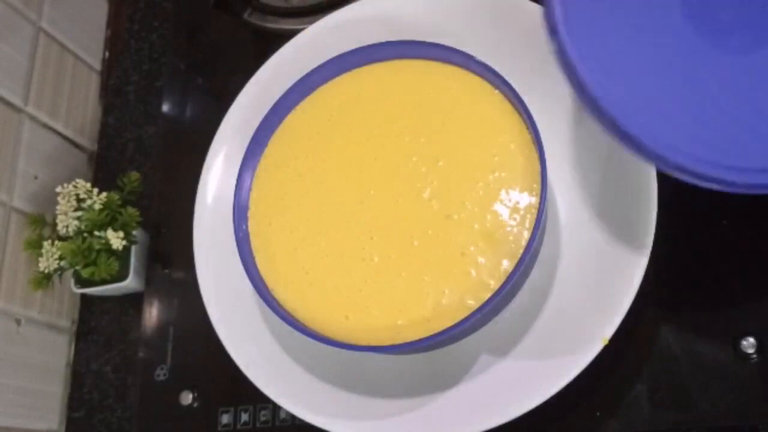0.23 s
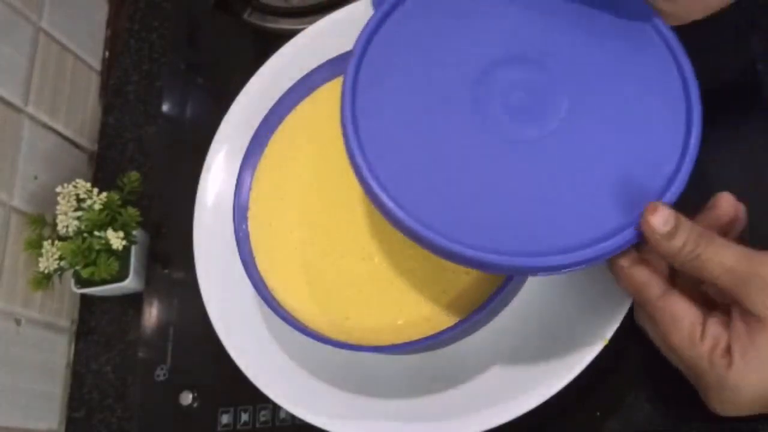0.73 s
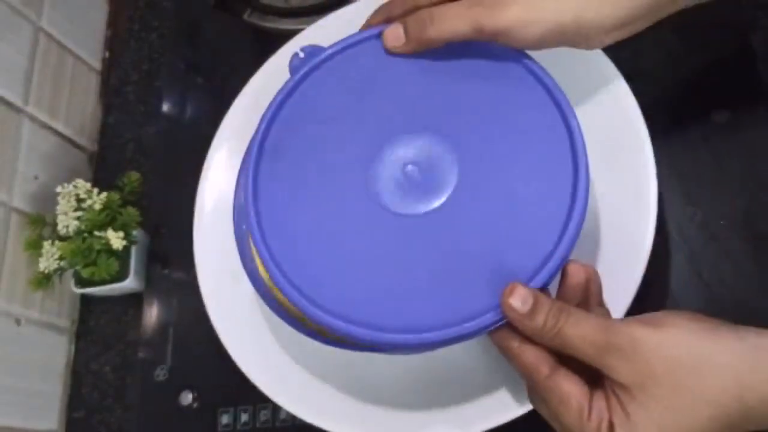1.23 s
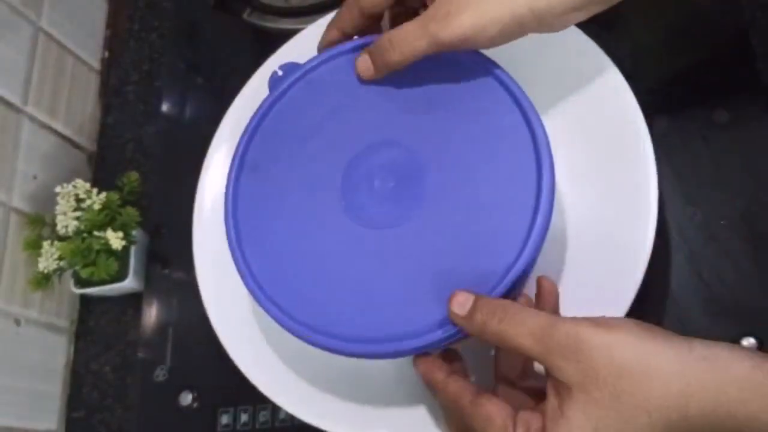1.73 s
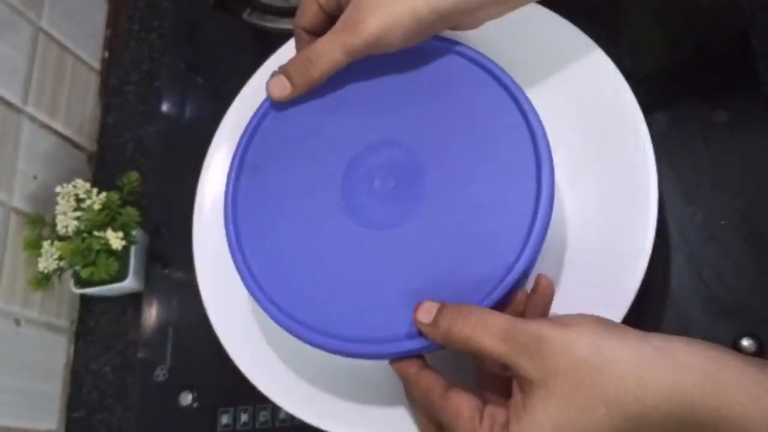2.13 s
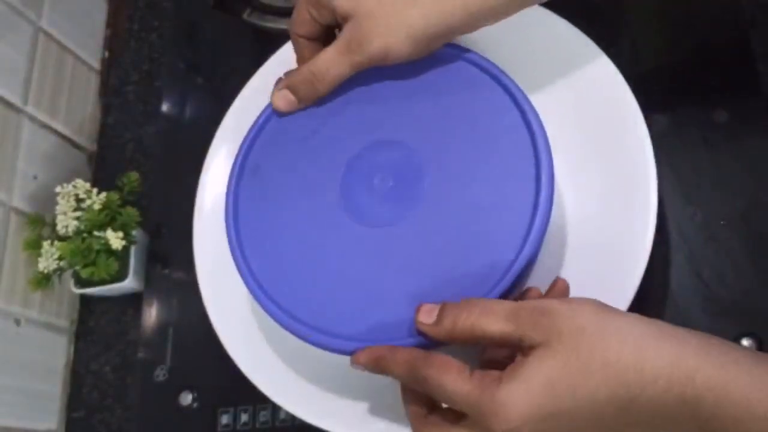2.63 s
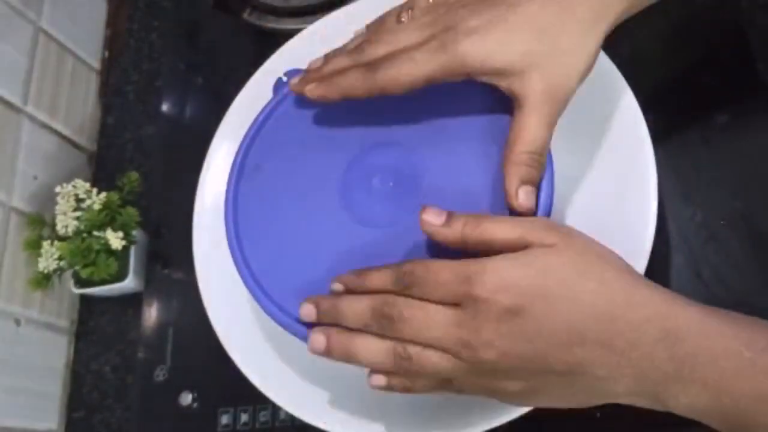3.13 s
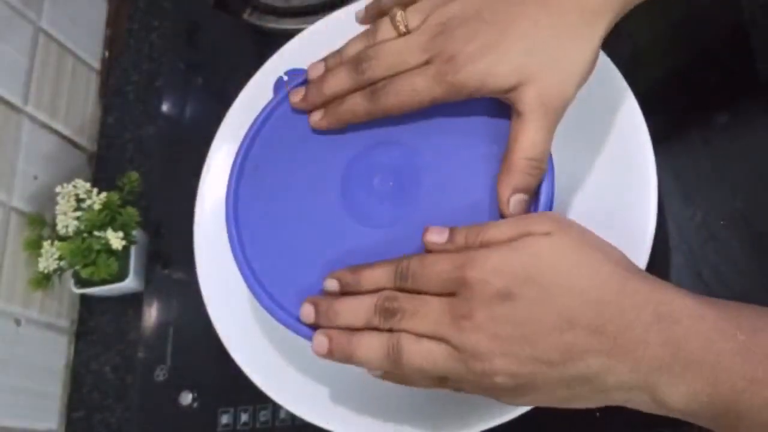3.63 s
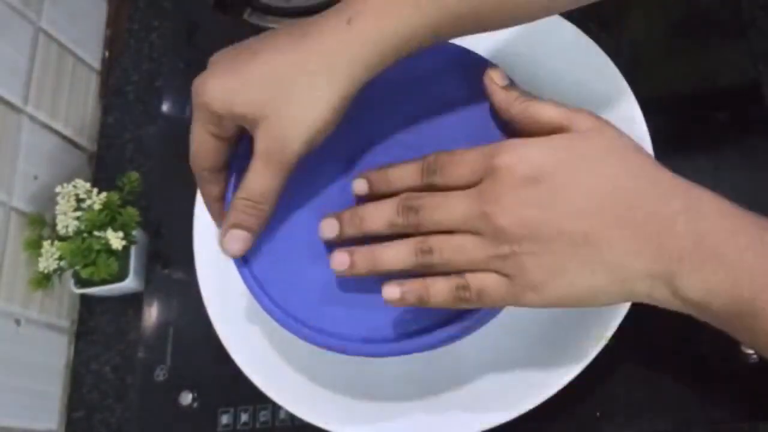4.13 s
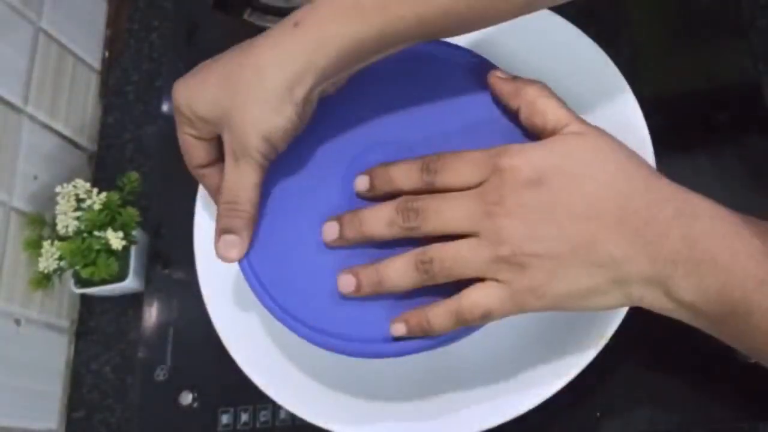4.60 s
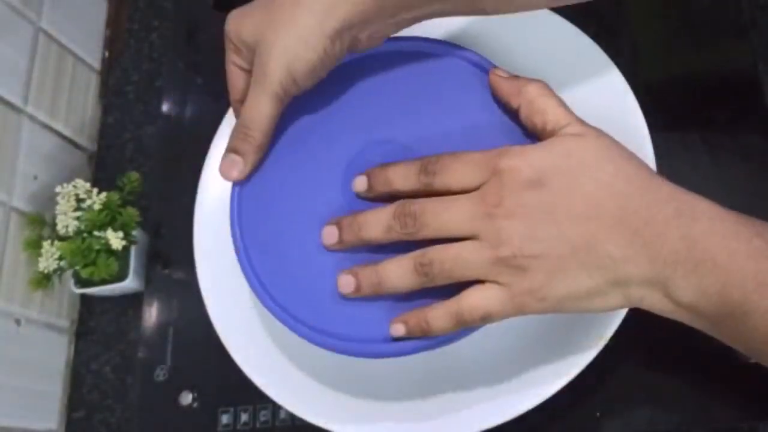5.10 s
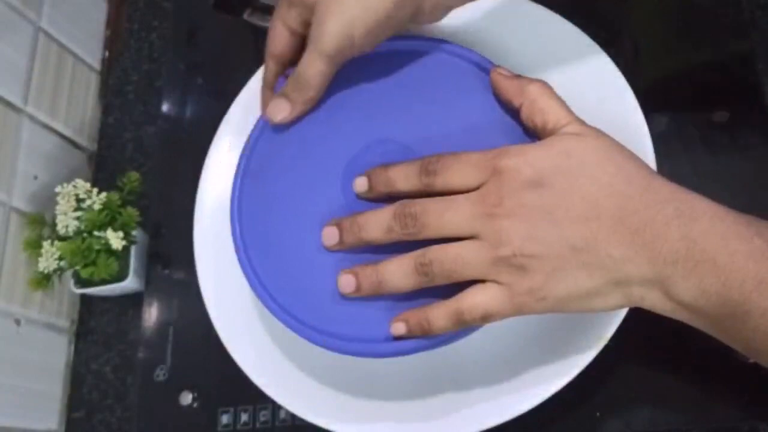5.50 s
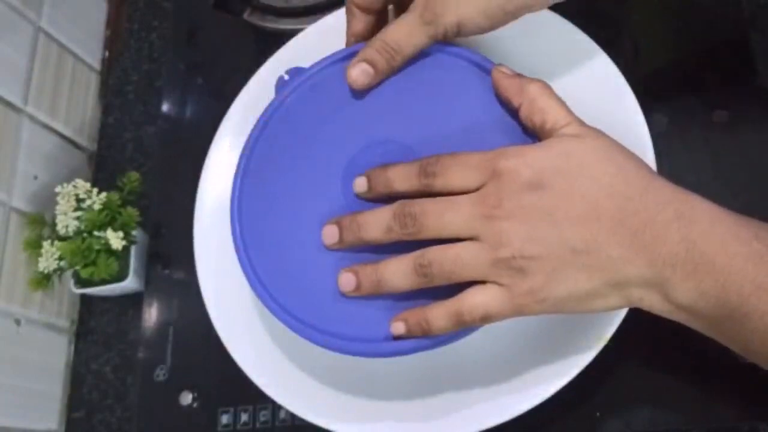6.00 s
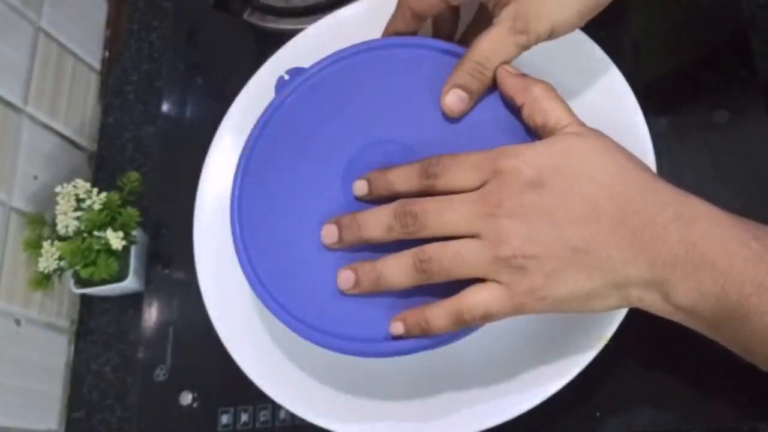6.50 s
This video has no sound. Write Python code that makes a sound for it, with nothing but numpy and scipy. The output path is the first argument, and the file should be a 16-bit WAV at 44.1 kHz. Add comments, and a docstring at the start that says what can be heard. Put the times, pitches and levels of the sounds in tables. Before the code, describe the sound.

In a hard-walled kitchen, a plastic lid is set on a round tub standing on a plate and pressed shut. Light clicks come first, then a quick cluster of louder snaps, a pause, and one strong hollow knock. More separate clicks follow, with faint rubs of fingers on plastic. The sounds are close, with a short echo, over low room noise and a faint motor hum.

```python
"""In a hard-walled kitchen, a plastic lid is set on a round tub standing on a plate and pressed home.
The rim snaps in bit by bit: each snap is an impulsive crackle that excites the modes of lid, tub and plate.
Between snaps, fingers slide on the lid with a frictional hiss. The walls reverberate,
over steady room noise and the wavering hum of an appliance motor."""
import sys
import numpy as np
from scipy import signal
from scipy.fft import rfft, irfft, next_fast_len
from scipy.io import wavfile
from scipy.ndimage import uniform_filter1d

SR = 44100
rng = np.random.default_rng(int(sys.argv[2]) if len(sys.argv) > 2 else 0)


def to_wav(s):
    """Save 16-bit WAV."""
    ch = np.atleast_2d(s).T  # columns
    pcm = np.round(np.clip(ch, -1, 1) * 32767)  # PCM
    wavfile.write(sys.argv[1], SR, pcm.astype(np.int16))


N = 297675

# Snaps of the rim: (time [s], strength [dB], weight: how far the tub moves [dB],
# brightness: how hard the edge slips [dB], rim pitch [Hz], its level [dB], second pitch [Hz],
# its level [dB], plate jolt [dB], crackle decay time [ms]); levels and jolt add to strength
RIM_SNAPS = [(1.2662, -50.5, -4, -46, 960, 9.5, 1920, -2, -14, 2.45),
             (1.481, -39, -7.5, -39, 985, 9.5, 1970, -6, -20, 2.3),
             (1.5506, -41.5, -21, -49, 896, 12, 1720, 9, -15, 2.3),
             (1.7378, -54, -1.5, -11, 700, 7, 2500, -6, -4, 2.74),
             (1.943, -35, -17, 0.5, 3770, 16, 1390, 10.5, -0.5, 2.84),
             (2.1658, -39.5, -13, -13.5, 1540, 11, 950, 4.5, -9, 5.36),
             (2.2298, -50, -25, -10, 1240, 15.5, 2000, 2, 5, 2),
             (2.319, -47.5, -9, -36, 1270, 18.5, 1650, 15.5, -17, 2.4),
             (2.5503, -35.5, -46, -7, 1270, 21.5, 1650, 14.5, 0.5, 3.7),
             (2.592, -38, 3, -26, 633, 18.5, 226, 17, 11, 7.4),
             (2.6075, -40.5, -11.5, 3.5, 790, 18, 1470, 8, -9, 9),
             (2.906, -27, -7, -12, 802, 13, 239, 10.5, -6, 4.64),
             (3.194, -37, -9.5, -9, 505, -3, 2100, 14.5, -16, 2.2),
             (3.233, -24, -14.5, -16, 827, 8, 2160, 8, -11.5, 3.33),
             (3.2545, -25, -8, -21, 850, 10, 251, 5, -15, 3.8),
             (3.277, -21.5, -15, -20.5, 785, 4.5, 920, -6, -27, 4),
             (3.7537, -53, -6.5, -16, 690, -13, 2500, -9, 0, 3.43),
             (3.8625, -51, -1.5, -6.5, 765, 0, 2500, -10, -8, 7),
             (4.0795, -57, -8, -3, 600, 6, 4500, 0, 3, 3),
             (4.262, -51, -3.5, -12, 1270, 6, 1060, 0, -15, 2.18),
             (4.7105, -15.5, -6.5, -4, 466, 6.5, 252, 9.5, -11, 2.75),
             (4.9823, -35, -7.5, -8, 846, 14, 405, 15.5, -11, 1.12),
             (5.241, -28, -8, -19, 755, 12, 2280, -10, -20, 2.95),
             (5.5209, -32, -7.5, -18, 853, 13, 366, 9, -19, 3.5),
             (5.8221, -22, -24.5, 3, 2020, 10, 5100, -5, 4, 5.7),
             (6.1532, -44.5, -10, -16, 1310, 14, 930, 7, 1, 3.7),
             (6.3192, -37.5, -23, -9, 1120, 12.5, 3900, 17, -1.5, 2.08),
             (6.3813, -52, -19, 5, 1070, 18.5, 2500, 5, -10, 2.4),
             (6.4534, -45.5, -22, -3, 1374, 9.5, 2960, 2, 1, 7),
             (6.7181, -53.5, 3.5, -39, 667, 18.5, 257, -10, -13, 4.6),
             (6.7267, -46, 0, -38, 614, 14, 255, -13, -14.5, 2.4)]
# Bands of a snap: (low edge [Hz], high edge [Hz], level over strength [dB], weight slope [dB/dB],
# brightness slope [dB/dB], stereo coherence [0-1], crackle share [0-1], room send [dB], left bias [dB])
SNAP_BANDS = [(66.5, 260, 10, 3.3, 0, 0.7, 0.06, -1.5, 3), (165, 474, 11, 1.05, 0, 0.89, 0.52, -1, -1),
              (444, 1770, 17, 0.68, 0.5, 0.85, 0.27, 1, -0.5),
              (1075, 2400, 15.5, 0.68, 0.12, 0.2, 0.55, -2, -1),
              (2250, 4680, 14, 0, 0.44, 0.1, 0.76, -5.5, -1.5), (5680, 10800, 16.5, 0, 1.48, 0, 1, -4, 2.5),
              (11000, 15500, 9, 0.6, 0.9, 0.4, 0.9, 0.5, -2)]
# Modes of lid and tub, and of the plate: (frequency [Hz], gain [dB], time to fall 60 dB [s])
TUB_MODES = [(161.5, -39, 0.084), (188.4, -35, 0.074), (274.3, -40, 0.07), (380, -46.5, 0.047),
             (435, -40, 0.048), (552, -36.5, 0.038), (624, -41, 0.087), (721, -43.5, 0.11),
             (796.2, -41, 0.12), (890, -49, 0.07), (971.5, -40, 0.078), (1083, -42, 0.091),
             (1330, -49, 0.065), (1690, -38.5, 0.02)]
PLATE_MODES = [(2027, -23.5, 0.071), (2736, -12, 0.035), (3220, -15.5, 0.042), (4006, -21, 0.087),
               (4456, -21, 0.049), (5800, -18, 0.015), (6503, -9, 0.056), (6570, -7, 0.047),
               (7280, -12.5, 0.041), (7560, -20, 0.034), (11900, -26, 0.02), (13000, -29, 0.017),
               (13900, -32, 0.02)]
# Finger strokes: (start [s], duration [s], hiss level [dB], low band over hiss [dB])
FINGER_STROKES = [(0.865, 0.068, -72, 8.5), (1.544, 0.33, -84.5, 12.5), (2.57, 0.052, -59.5, 4),
                  (3.223, 0.076, -72, 20), (3.815, 0.36, -74, 4.5), (4.962, 0.11, -57, -0.5),
                  (5.53, 0.23, -58, -1.5), (6.13, 0.24, -63, -1.5), (6.322, 0.21, -71, 5)]
# Decay of the kitchen: (frequency [Hz], reverberation time [s])
REVERB_TIMES = [(100, 0.31), (250, 0.69), (450, 0.63), (1000, 0.54), (3000, 0.53), (8000, 0.43),
                (14000, 0.34)]
# Left-right likeness of echoes and of room noise: (frequency [Hz], coherence [0-1])
ECHO_COHERENCE = [(60, 1), (300, 1), (700, 0.47), (1400, 0)]
NOISE_COHERENCE = [(60, 0.13), (300, 0.53), (700, 0.04), (1400, 0.15)]
# Room noise: (frequency [Hz], spectral density [dB per Hz])
NOISE_SPECTRUM = [(25, -110), (50, -103), (90, -89), (200, -93.5), (400, -93), (800, -101), (1400, -112),
                  (2500, -117), (4500, -115), (5300, -122), (6200, -115), (8000, -113), (15000, -113)]
# Resonances in the room noise: (centre [Hz], bandwidth [Hz], level [dB])
NOISE_RESONANCES = [(92.4, 16, -76), (316, 24, -75.5), (7404, 320, -78.5)]
# Extra treble loss of slides, echoes and room noise: (frequency [Hz], gain [dB])
SUSTAINED_RESPONSE = [(8500, 0.5), (8900, -18), (9900, -23.5), (11200, -34), (11600, 0.5), (15000, -1.5),
                      (15600, -4)]
# Overall treble colour, a peak near 7 kHz and then a deep gap at 9-11 kHz: (frequency [Hz], gain [dB])
TREBLE_COLOUR = [(4400, 7.5), (6000, 4), (7500, 7), (8400, 6.5), (8850, -8.5), (9800, -10), (11200, -30),
                 (11600, -4), (15000, 3), (15600, -24)]

RIM_Q, RIM_COHERENCE, RIM_CRACKLE_SHARE = 3.62, 0.94, 0.67
RELEASE_AT = 0.307  # moment of release, in crackle decay times
RADIATION_CUTOFF_HZ = 75  # the lid is too small to radiate below this
TUB_SPREAD, PLATE_SPREAD = 0.021, 0.0065  # relative shift of the modes as the grip moves
RIM_SEND_DB, TUB_SEND_DB, PLATE_SEND_DB, SLIDE_SEND_DB = -6, -5.5, -5, -1  # into the room
RIGHT_DELAY_S = 0.0001  # the lid lies nearer the left microphone
SLIDE_RISE_SHARE, SLIDE_TOP_DB = 0.18, 5.5
MOTOR_HZ, FUNDAMENTAL_DB, OCTAVE_DB = 143.8, -67, -71.5
LOWPASS_HZ = 16300


def snaps():
    """Impulsive excitation: the slipping rim drives lid, tub and plate. Returns direct sound and send."""
    (times, strength_db, weight_db, bright_db,
     rim_hz, rim_db, second_hz, second_db, jolt_db, decay_ms) = np.transpose(RIM_SNAPS)
    t = np.arange(2048) / SR
    decay_s = decay_ms[:, None] / 1000
    age = t / decay_s
    envelope = np.exp(-age) * (1 - np.exp(-2 * age))
    noises = np.moveaxis(rng.standard_normal((len(times), 2, len(t))), 1, 0) * envelope
    release = np.maximum(1 - np.abs(t - RELEASE_AT * decay_s) * SR, 0)  # one sharp pulse
    crackle = stereo(*noises, RIM_COHERENCE)
    force = power_mix(crackle / norm(crackle), release, RIM_CRACKLE_SHARE)
    rim = place(times, rim_ring(force, rim_hz), strength_db + rim_db)
    rim += place(times, rim_ring(force, second_hz), strength_db + second_db)
    knock, knock_send = knocks(times, strength_db, weight_db, bright_db, noises, release, age)
    radiation = signal.butter(4, RADIATION_CUTOFF_HZ, "high", fs=SR, output="sos")
    impact = signal.sosfilt(radiation, np.array([rim + knock, undb(RIM_SEND_DB) * rim + knock_send]))
    tub = modal_ring(impact, TUB_MODES, TUB_SPREAD)
    plate = modal_ring(place(times, force, strength_db + jolt_db), PLATE_MODES, PLATE_SPREAD)
    direct = impact[0] + tub[0] + plate
    send = impact[1] + undb(TUB_SEND_DB) * tub[1] + undb(PLATE_SEND_DB) * plate
    return direct, send


def knocks(times, strength_db, weight_db, bright_db, noises, release, age):
    """A brief force has a broad spectrum: crackle and release, weighted band by band."""
    direct = send = 0
    for k, row in enumerate(SNAP_BANDS):
        lo_hz, hi_hz, db, per_weight, per_bright, coherence, share, send_db, left_db = row
        crackle = stereo(*noises, coherence) * np.exp(-age * lo_hz / 6000)  # dulls as it dies
        crackle /= norm(band(crackle, lo_hz, hi_hz))
        pulse = release / norm(band(release, lo_hz, hi_hz))
        level_db = strength_db + db + per_weight * weight_db + per_bright * bright_db
        train = place(times, power_mix(crackle, pulse, share), level_db)
        pan = undb([[left_db / 2], [-left_db / 2]])
        part = (-1) ** k * band(train, lo_hz, hi_hz) * pan  # neighbouring bands meet in phase
        direct = direct + part
        send = send + undb(send_db) * part
    return direct, send


def rim_ring(force, pitches_hz):
    """Damped resonance: each freed stretch of rim rings briefly at its own pitch, at unit energy."""
    rings = np.zeros_like(force)
    for k, hz in enumerate(pitches_hz):
        b, a = signal.iirpeak(hz, RIM_Q, SR)
        rings[:, k] = signal.lfilter(b, a, signal.lfilter(b, a, force[:, k]))  # twice: steep flanks
    return rings / norm(rings)


def modal_ring(force, modes, spread):
    """Modal superposition: a body rings as damped sinusoids, which shift as the grip changes."""
    t = np.arange(SR // 4) / SR
    grip = 2 * np.pi * 1.3 * np.arange(N) / SR
    out = 0
    for blend in (np.cos(grip), np.sin(grip)):
        shifts = 1 + spread * rng.standard_normal(len(modes))
        response = sum(undb(db - 60 * t / t60) * np.sin(2 * np.pi * hz * shift * t)
                       for (hz, db, t60), shift in zip(modes, shifts))
        response = np.array(response, ndmin=force.ndim)
        out = out + signal.fftconvolve(force * blend, response, axes=-1)[..., :N]
    return out


def finger_slides():
    """Sliding friction: skin on plastic makes a grainy hiss, with a duller band from the lid."""
    t = np.arange(N) / SR
    grain = undb(3.0 * rng.exponential(size=(2, N))) * rng.standard_normal((2, N))
    grain *= undb(1.5 * wander(40))
    layers = [band(grain, 5800, 7930), -band(grain, 360, 3740), -band(grain, 9100, 14100)]
    hiss, low, top = [x / np.std(x) for x in layers]
    out = 0
    for start, duration, hiss_db, low_db in FINGER_STROKES:
        touch = np.interp(t, start + duration * np.array([0, SLIDE_RISE_SHARE, 1]), [0, 1, 0])
        out = out + touch * undb(hiss_db) * (hiss + undb(low_db) * low + undb(SLIDE_TOP_DB) * top)
    return out


def kitchen_reverb(send):
    """Reverberation: dense echoes die faster in the treble; their pattern changes as the hands move."""
    t = np.arange(SR) / SR
    tails = 0
    for hz in 70 * 2 ** np.arange(0, 8, .5):
        noise = half_octave(rng.standard_normal((2, 2, SR)), hz)
        decay = undb(-60 * t / lookup(REVERB_TIMES, hz))
        tails = tails + stereo(*noise, lookup(ECHO_COHERENCE, hz)) * decay
    onset = 1 - np.exp(-t / 0.0002)  # the first walls answer almost at once
    tails = tails * onset / np.sqrt(SR * .028)
    position = 2 * np.pi * .9 * np.arange(N) / SR
    return sum(signal.fftconvolve(send * blend, tails[:, k], axes=1)[:, :N]
               for k, blend in enumerate((np.cos(position), np.sin(position))))


def room_noise():
    """Amplitude-modulated noise: bands swell together and flicker alone, beside narrow resonances."""
    swell = wander(0.61)
    hz = np.fft.rfftfreq(N, 1 / SR)
    amplitude = undb(lookup(NOISE_SPECTRUM, hz)) * np.sqrt(SR / 2)
    white = stereo(*rfft(rng.standard_normal((2, N))), lookup(NOISE_COHERENCE, hz))
    noise = irfft(white * amplitude, N)
    out = 0
    for k, centre in enumerate(30 * 2 ** np.arange(0, 9.1, .5)):
        gain = undb(.5 * swell + .7 * wander(6))
        out = out + (-1) ** k * gain * half_octave(noise, centre)
    for centre, width, db in NOISE_RESONANCES:
        drone = band(rng.standard_normal((2, N)), centre - width / 2, centre + width / 2)
        out = out + undb(db) * stereo(*drone, lookup(NOISE_COHERENCE, centre)) / np.std(drone)
    return out


def motor_hum():
    """Periodic vibration: two harmonics of a motor whose speed and loudness waver quickly."""
    phase = 2 * np.pi * np.cumsum(MOTOR_HZ + 3.28 * wander(13)) / SR
    return sum(undb(db + 2.47 * wander(24.89)) * np.sqrt(2) * np.sin(harmonic * phase)
               for harmonic, db in ((1, FUNDAMENTAL_DB), (2, OCTAVE_DB)))


def place(times, bursts, levels_db):
    """Path difference: each burst arrives at its time and level, slightly later on the right."""
    train = np.zeros((2, N + SR))
    for when, burst, gain in zip(times, np.moveaxis(bursts, 1, 0), undb(levels_db)):
        for channel, delay in enumerate((0, RIGHT_DELAY_S)):
            at = int((when + delay) * SR)
            train[channel, at:at + burst.shape[-1]] += gain * burst[channel]
    return train[:, :N]


def undb(db):
    """Amplitude ratio from decibels."""
    return 10 ** (np.asarray(db) / 20)


def norm(x):
    """Square root of a signal's energy."""
    return np.sqrt(np.sum(x ** 2, axis=-1, keepdims=True))


def power_mix(a, b, share):
    """Incoherent signals add in power; share is the weight of a."""
    return np.sqrt(share) * a + np.sqrt(1 - share) * b


def stereo(mid, side, coherence):
    """Partial coherence: left and right are the sum and difference of independent signals."""
    return np.array([power_mix(mid, sign * side, (1 + coherence) / 2) for sign in (1, -1)])


def wander(rate_hz):
    """Smoothed random steps of unit standard deviation."""
    hold = int(SR / rate_hz)
    steps = np.repeat(rng.standard_normal(N // hold + 1), hold)
    smooth = uniform_filter1d(uniform_filter1d(steps, hold), hold)[:N]
    return smooth / np.std(smooth)


def lookup(table, hz):
    """Interpolation on a logarithmic frequency axis."""
    freqs, values = np.transpose(table)
    return np.interp(np.log(np.maximum(hz, 1)), np.log(freqs), values)


def band(x, lo_hz, hi_hz):
    """Causal band-pass filter."""
    return signal.sosfilt(signal.butter(2, [lo_hz, hi_hz], "band", fs=SR, output="sos"), x)


def half_octave(x, hz):
    """Band-pass of constant relative bandwidth."""
    return band(x, hz / 2 ** .25, hz * 2 ** .25)


def equalise(x, response):
    """Zero-phase filtering by a (frequency [Hz], gain [dB]) table."""
    size = next_fast_len(N)
    gain = undb(lookup(response, np.fft.rfftfreq(size, 1 / SR)))
    return irfft(rfft(x, size) * gain, size)[..., :N]


def scene():
    """Superposition of snaps, slides, their reverberation, room noise and hum."""
    direct, send = snaps()
    slides = finger_slides()
    echoes = kitchen_reverb(send + undb(SLIDE_SEND_DB) * slides)
    return direct + equalise(slides + echoes + room_noise(), SUSTAINED_RESPONSE) + motor_hum()


def record(dry):
    """Frequency response: the treble has a peak and a gap, and a steep low-pass cuts the top."""
    lowpass = signal.ellip(8, .2, 70, LOWPASS_HZ, fs=SR, output="sos")
    return signal.sosfilt(lowpass, equalise(dry, TREBLE_COLOUR))


dry = scene()
out = record(dry)
to_wav(out)
```